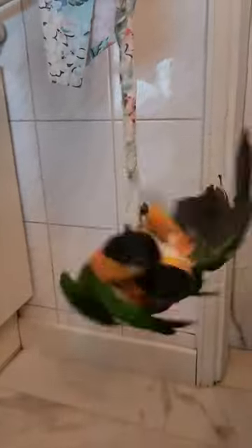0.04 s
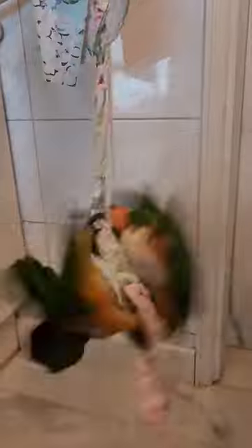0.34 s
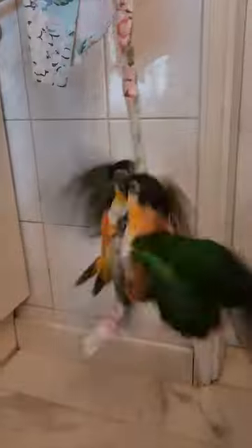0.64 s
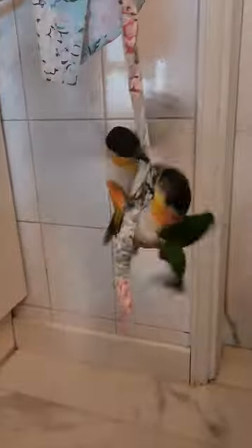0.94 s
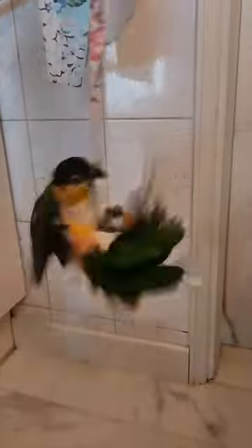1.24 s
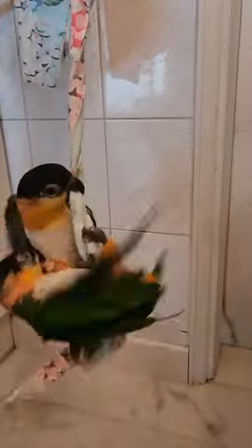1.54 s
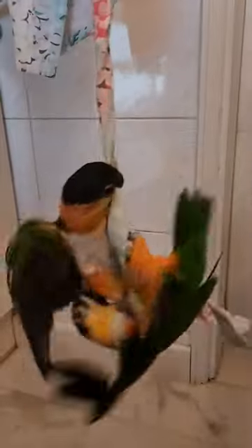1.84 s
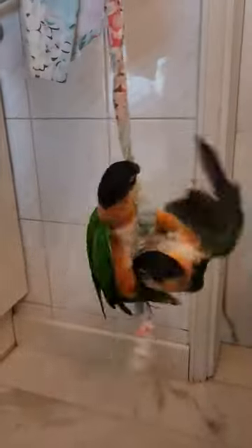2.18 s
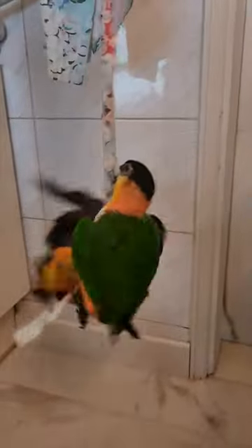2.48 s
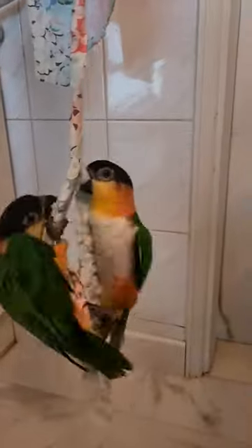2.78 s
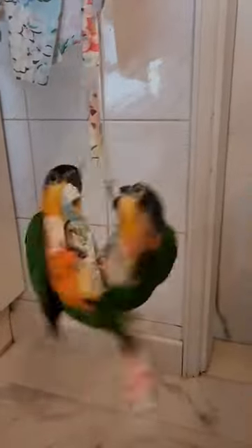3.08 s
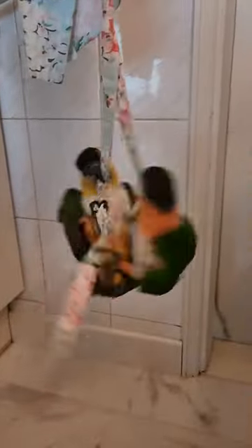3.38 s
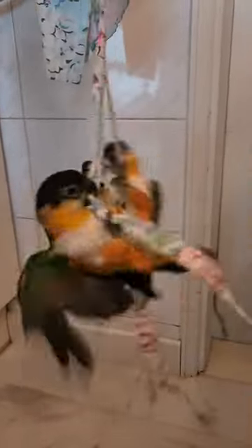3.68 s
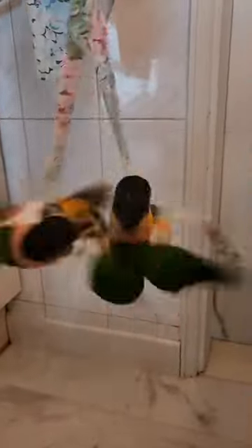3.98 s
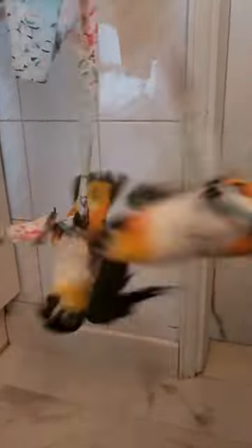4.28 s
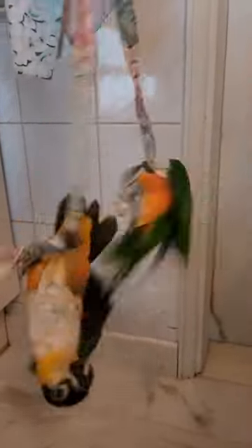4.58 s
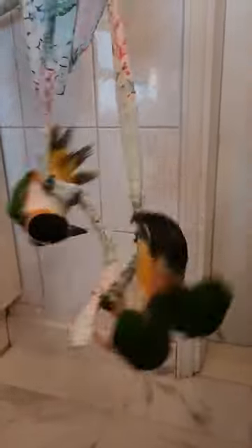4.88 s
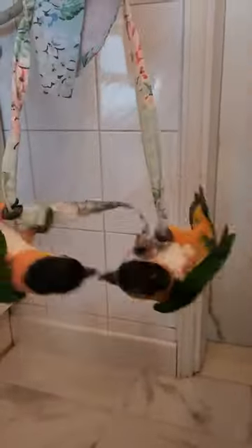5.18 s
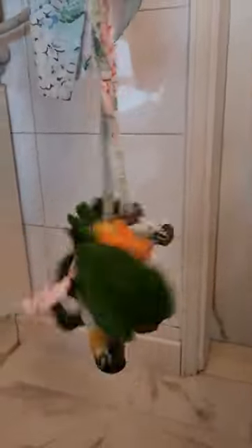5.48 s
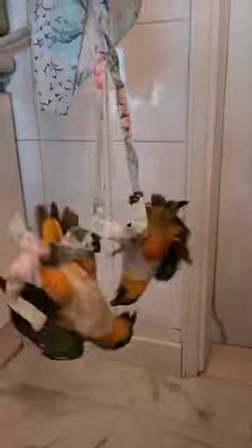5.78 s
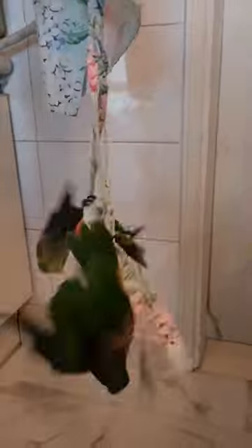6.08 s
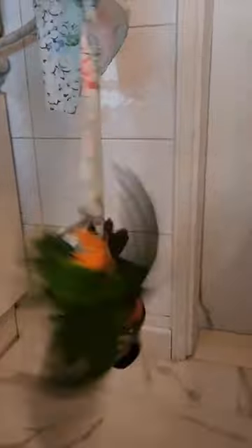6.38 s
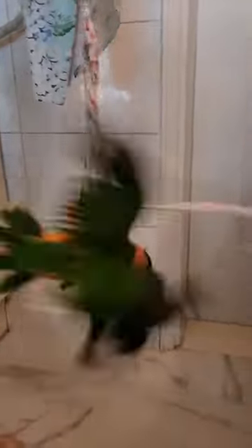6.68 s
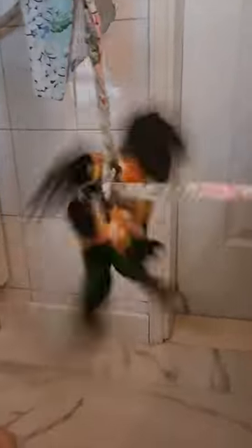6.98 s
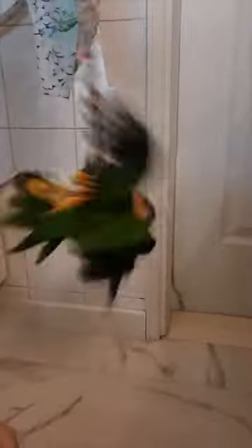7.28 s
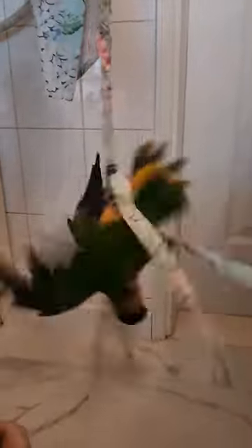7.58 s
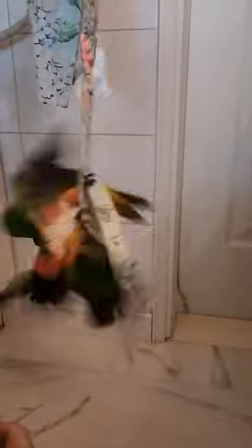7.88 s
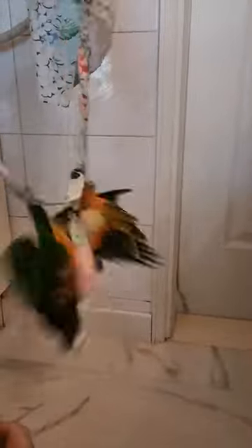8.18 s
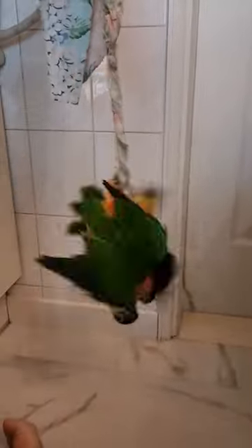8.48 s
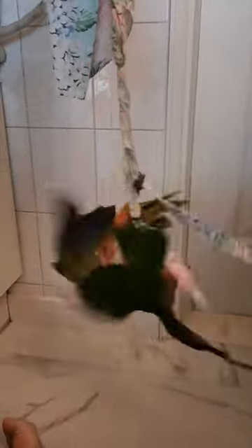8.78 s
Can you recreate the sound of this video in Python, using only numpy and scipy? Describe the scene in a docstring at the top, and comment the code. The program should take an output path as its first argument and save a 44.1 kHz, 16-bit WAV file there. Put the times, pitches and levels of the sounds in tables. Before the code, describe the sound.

Two small parrots flap and tussle close by in three bursts, with feather rustles, wing slaps and two brief hoarse calls.

```python
"""Parrots tussling in a kitchen

Two small parrots tussle on hanging cloth strings, close to the microphone in a tiled kitchen.
Each wingbeat is a swish of feathers, a soft whump and a puff of air on the microphone. Wing tips slap,
beaks and claws knock and scratch, and plumage and cloth rustle between the bursts. Near the end the
birds give two short hoarse calls. A fridge hums behind them."""
import sys
import numpy as np
from scipy import signal
from scipy.fft import rfft, irfft, next_fast_len
from scipy.io import wavfile
from scipy.ndimage import uniform_filter1d

SR = 44100
rng = np.random.default_rng(int(sys.argv[2]) if len(sys.argv) > 2 else 0)


def generate_wav(signal):
    """Clip the signal to [-1, 1] and save it as 16-bit WAV at the path in sys.argv[1]."""
    frames = np.transpose(np.atleast_2d(signal))
    scaled = np.clip(frames, -1, 1) * 32767
    pcm = np.round(scaled).astype(np.int16)
    wavfile.write(sys.argv[1], SR, pcm)


N = 394254
TIME = np.arange(N) / SR


def undb(db):
    """Decibels to gain."""
    return 10 ** (np.asarray(db) / 20)


def unit(x):
    """Scale to rms 1."""
    return x / np.sqrt(np.mean(x ** 2))


def over_hz(points, hz):
    """Read (frequency, value) points on a log-frequency axis."""
    f, value = np.transpose(points)
    return np.interp(np.log(np.maximum(hz, 1)), np.log(f), value)


def bouts(curves):
    """Gain over time from one (time, level) curve a bout, next to nothing between bouts."""
    curves_db = (np.interp(TIME, *np.transpose(rows), left=-np.inf, right=-np.inf) for rows in curves)
    return sum(undb(db) for db in curves_db) + 1e-5


def walk(rate, size=N):
    """A random wander of spread near 1, turning `rate` times a second."""
    steps = np.arange(size) * rate / SR
    points = rng.standard_normal(int(steps[-1]) + 2)
    return np.interp(steps, np.arange(len(points)), points) * np.sqrt(3 / 2)


# Stereo width by frequency: bass centred, middle wide and diffuse, treble narrow.
# (frequency [Hz], left-right correlation [-1 to 1])
STEREO_LIKENESS = [(130, 0.96), (280, 0.74), (550, 0.4), (1000, 0.1), (1600, -0.086), (2400, -0.017),
                   (3500, -0.17), (5900, -0.029), (6600, 0.94), (10000, 0.99), (15000, 0.71)]
# Stereo balance: (frequency [Hz], left minus right [dB])
STEREO_BALANCE = [(200, -2), (900, 0.5), (2000, -2.5), (3300, 2), (5500, -1.5), (6800, -4.5), (8000, -6.5),
                  (8600, 2), (10000, -2.5), (14000, 0)]
def hiss(envelope, colour, patchy_db=0):
    """Stereo noise under an envelope, filtered to a colour with random dips."""
    size = next_fast_len(len(envelope))
    hz = np.fft.rfftfreq(size, 1 / SR)
    mid, side = rfft(rng.standard_normal((2, len(envelope))) * envelope, size)
    likeness = np.clip(over_hz(STEREO_LIKENESS, hz), -1, 1)
    sign = np.array([[1], [-1]])
    pair = (mid * np.sqrt(1 + likeness) + sign * side * np.sqrt(1 - likeness)) / np.sqrt(2)
    pair = pair * undb(sign * over_hz(STEREO_BALANCE, hz) / 2)
    # each burst gets its own random dips across frequency
    humps = np.minimum(rng.standard_normal(size=72), .9)
    dips_db = patchy_db * np.interp(np.sqrt(hz), np.linspace(0, np.sqrt(SR / 2), len(humps)), humps)
    response = unit(undb(over_hz(colour, hz) + dips_db))
    return irfft(pair * response, size)[:, :len(envelope)]


def bursts(times, levels_db, colour, rise_s, fall_s, grain_db, grain_hz, patchy_db, size=8192):
    """A grainy swell of noise at each time; its loudest 15 ms reach the given level."""
    out = np.zeros((2, N + 2 * size))
    t = (np.arange(size) - size // 2) / SR
    swell = np.exp(-np.abs(t) / np.where(t < 0, rise_s, fall_s))
    for time, db in zip(times, levels_db):
        burst = hiss(swell * undb(grain_db * walk(grain_hz, size)), colour, patchy_db)
        loudest = uniform_filter1d(np.mean(burst ** 2, axis=0), size=660).max()
        start = int(time * SR)
        out[:, start:start + size] += burst * undb(db) / np.sqrt(loudest)
    return out[:, size // 2:size // 2 + N]


def pulses(times, levels_db, shape, spread, size=4096):
    """A pressure pulse shape(t) at each time, randomly stretched; its loudest 15 ms reach the level."""
    out = np.zeros(N + 2 * size)
    t = (np.arange(size) - size // 2) / SR
    for time, db, chance in zip(times, levels_db, rng.uniform(-1.16, 1, len(times))):
        pulse = shape(t * np.exp(spread * chance))
        loudest = uniform_filter1d(pulse ** 2, size=660).max()
        start = int(time * SR)
        out[start:start + size] += pulse * undb(db) / np.sqrt(loudest)
    return out[size // 2:size // 2 + N]


# Motor lines of the fridge, behind the birds: (frequency [Hz], rms level [dB])
FRIDGE_LINES = [(236.9, -71.5), (360.7, -63), (602.9, -75.5), (721.4, -81)]
# Colour of the kitchen's room tone: (frequency [Hz], relative density [dB])
ROOM_TONE = [(12, -37), (28, 3.5), (80, -1), (160, -10), (240, -1), (300, -14), (380, -5), (480, -2.5),
             (620, -9.5), (900, -16.5), (1500, -18.5), (2300, -36), (3500, -48), (15000, -38)]
def kitchen(drift=0.00346, waver_db=1.5, room_db=-61):
    """The fridge's slightly wavering motor lines over the soft noise of the room."""
    motor_time = np.cumsum(1 + drift * walk(9)) / SR
    hum = sum(np.sqrt(2) * undb(db + waver_db * walk(18)) * np.sin(2 * np.pi * hz * motor_time)
              for hz, db in FRIDGE_LINES)
    return hum + hiss(undb(room_db + 0.14 * walk(3.3)), ROOM_TONE)


# How hard the birds struggle, heard as rubbing feathers, one curve a bout: (time [s], level [dB])
EFFORT = [
    [(0.19, -56.5), (0.278, -48.5), (0.44, -44.5), (0.628, -41.5), (1.024, -43.5), (1.434, -50.5),
     (1.582, -53), (1.72, -58)],
    [(4.0, -55), (4.102, -46), (4.262, -45.5), (4.37, -41), (4.816, -50), (5.056, -58.5), (5.12, -69)],
    [(6.18, -50.5), (6.44, -47), (6.83, -48), (7.24, -42), (7.41, -49), (7.9, -47.5), (8.11, -48.5),
     (8.29, -51), (8.38, -59.5)],
    [(8.38, -56.5), (8.6, -56.5), (8.94, -55)],
]
# Plumage rubbing on the strings as a bird shifts its grip: (start [s], length [s], level [dB])
GRIP_SHIFTS = [(0.0, 0.013, -54.5), (1.777, 0.16, -50.5), (1.976, 0.2, -61), (2.18, 0.035, -54),
               (2.258, 0.11, -65), (2.738, 0.028, -53), (2.85, 0.24, -59.5), (3.17, 0.23, -59),
               (3.631, 0.17, -51), (3.854, 0.11, -53), (5.31, 0.23, -61), (5.537, 0.19, -54),
               (5.736, 0.14, -53), (5.92, 0.12, -56.5), (6.055, 0.095, -48.5), (7.133, 0.083, -54),
               (7.924, 0.14, -47.5), (8.548, 0.061, -47.5), (8.813, 0.15, -58.5)]
def rubbing(effort_trim_db=-1.5, fidget_db=-64.5, attack_s=0.029, release_s=0.032, sag_db_per_s=11):
    """Strength of the rubbing: bouts of effort, constant fidgeting, and grip shifts that swell and sag."""
    power = (undb(effort_trim_db) * bouts(EFFORT)) ** 2 + undb(fidget_db) ** 2
    for start, length, db in GRIP_SHIFTS:
        t = TIME - start
        edges = np.exp(np.minimum(t, 0) / attack_s - np.maximum(t - length, 0) / release_s)
        power += (edges * undb(db - sag_db_per_s * np.clip(t, 0, length))) ** 2
    return np.sqrt(power)


# Colour of feathers and cloth rubbing close by: (frequency [Hz], relative density [dB])
RUB_COLOUR = [(120, -8.5), (250, 0.5), (600, -5), (900, -8.5), (1300, -2.5), (1800, -3.5), (2200, -2),
              (3300, -7), (5400, -3), (6700, -1), (8000, -0.5), (8700, -4), (11200, -8), (15000, -11.5)]
def rustle(rub, flicks_per_s=42, scatter_db=1.5, flick_db=-2.5, bed_db=-7):
    """Feathers and cloth catch and let go in short flicks, each its own colour, over a smooth rubbing."""
    slots = np.arange(0, N / SR - 1 / flicks_per_s, 1 / flicks_per_s)
    delay, strength = rng.random((len(slots), 2)).T
    times = slots + delay / flicks_per_s
    rub_db = 20 * np.log10(np.interp(times, TIME, rub))
    levels_db = rub_db + flick_db + scatter_db * (2 * strength - 1)
    flicks = bursts(times, levels_db, RUB_COLOUR,
                    rise_s=0.0084, fall_s=0.028, grain_db=0, grain_hz=1100, patchy_db=8.5, size=4096)
    return flicks + undb(bed_db) * hiss(rub, RUB_COLOUR)


# Colour of a quill's tick or crack: (frequency [Hz], relative density [dB])
CRACK_COLOUR = [(500, -23), (2000, -1), (4000, 5.5), (5800, 0.5), (6800, 8), (8100, -0.5), (9000, 0),
                (15000, -1)]
def crackle(rub, ticks_per_s=80, scatter_db=3, trim_db=-10, decay_s=0.0012):
    """Single quills and claws snap past each other: tiny dry ticks within the rustle."""
    chance, strength = rng.random(N), rng.exponential(size=N)
    ticks = (chance < ticks_per_s / SR) * undb(scatter_db * np.minimum(strength, 4))
    envelope = signal.fftconvolve(ticks, np.exp(-TIME[:SR // 100] / decay_s))[:N]
    return undb(trim_db) * hiss(unit(envelope) * rub, CRACK_COLOUR)


# Wingbeats close to the microphone, about 14 a second, overlapping when both birds flap.
# Levels are before the trims: (time [s], feather swish [dB], air whoosh [dB], puff [dB])
WINGBEATS = [(0.282, -42.5, -54, -39), (0.36, -47, -46, -33), (0.453, -42, -46, -35.5),
             (0.522, -41.5, -44.5, -31.5), (0.59, -46, -43, -34), (0.62, -43, -41, -40),
             (0.687, -42, -40.5, -37.5), (0.775, -46, -42.5, -45), (0.83, -35.5, -39.5, -41),
             (0.875, -44, -41, -39), (0.948, -42.5, -45.5, -32.5), (0.978, -48, -48, -32.5),
             (1.015, -54, -60, -36), (1.049, -41, -46.5, -48), (1.102, -37.5, -37.5, -40),
             (1.158, -41, -41.5, -32), (1.195, -44, -45, -50), (1.25, -47.5, -47.5, -38.5),
             (1.32, -45.5, -62, -41.5), (1.36, -51, -64, -49), (1.452, -47.5, -59, -54),
             (1.509, -48.5, -55, -60), (1.574, -50, -74, -53), (1.779, -48, -53, -70),
             (4.068, -49, -53, -57), (4.136, -41, -53, -36.5), (4.2, -44.5, -49, -32),
             (4.225, -41.5, -47, -32.5), (4.277, -40.5, -42.5, -27), (4.355, -35, -37, -42),
             (4.43, -43, -42, -34), (4.49, -50, -64, -45), (4.586, -43, -56, -41), (4.716, -48, -70, -48),
             (4.798, -49.5, -70, -60.0), (4.894, -48.5, -58, -61.5), (4.936, -46, -60, -64),
             (5.565, -48, -57, -72), (5.757, -47.5, -69, -59.5), (6.258, -44, -55, -53.0),
             (6.3, -42.5, -45, -38.5), (6.353, -41, -40, -36), (6.431, -40, -41, -31.5),
             (6.499, -45, -42.5, -32.5), (6.569, -44.5, -43.5, -39), (6.646, -43.5, -45, -55),
             (6.709, -39.5, -51, -36.5), (6.78, -42.5, -43, -38), (6.855, -45, -44, -30.5),
             (6.922, -45.5, -45.5, -37), (7.016, -46.5, -45, -41), (7.088, -48, -46, -36),
             (7.135, -45, -43, -37), (7.16, -42.5, -45.5, -32.5), (7.23, -39.5, -35.5, -37),
             (7.274, -40, -47, -41), (7.32, -59, -52, -53), (7.386, -43, -47, -44),
             (7.446, -45.5, -51, -35.5), (7.531, -49, -56, -34.5), (7.642, -42, -45.5, -47),
             (7.723, -43, -51, -40), (7.815, -44, -47, -43), (7.905, -47.5, -48, -49),
             (7.982, -61, -50.5, -48.5), (8.06, -45.5, -51, -42), (8.149, -48, -68, -46),
             (8.209, -47, -57.5, -50), (8.295, -49.5, -55, -56), (8.458, -49.5, -54, -71),
             (8.546, -50.5, -57, -56), (8.603, -55, -58, -56), (8.65, -49.5, -57, -51),
             (8.75, -50, -57.5, -59)]
# Colours of a stroke's swish, whoosh and whump: (frequency [Hz], relative density [dB])
SWISH_COLOUR = [(1500, -18.5), (3200, -10), (5600, -6.5), (6700, -6.5), (8100, -4.5), (8700, -12.5),
                (10000, -8), (11200, -13), (15000, -11.5)]
WHOOSH_COLOUR = [(300, -7), (560, 7), (720, 5), (950, -1), (1160, 0), (1600, 2.5), (2200, -0.5), (3200, -8),
                 (6000, -9.5), (15000, -25)]
WHUMP_COLOUR = [(70, -13), (110, -4), (150, 1.5), (235, -1.5), (310, -12.5), (450, -12), (650, -21.5),
                (1100, -19), (2500, -66)]
def wings(swish_trim_db=1.3, whoosh_trim_db=-2, whump_trim_db=-16.5):
    """Feathers flick over each other and air rushes past them; the wing's push is a short whump."""
    times, swish_db, whoosh_db, puff_db = np.transpose(WINGBEATS)
    swish = bursts(times - .003, swish_db + swish_trim_db, SWISH_COLOUR,
                   rise_s=0.015, fall_s=0.023, grain_db=1.5, grain_hz=1300, patchy_db=7)
    whoosh = bursts(times - .004, whoosh_db + whoosh_trim_db, WHOOSH_COLOUR,
                    rise_s=0.016, fall_s=0.021, grain_db=4, grain_hz=400, patchy_db=11)
    whump = bursts(times - .005, puff_db + whump_trim_db, WHUMP_COLOUR,
                   rise_s=0.0081, fall_s=0.023, grain_db=1, grain_hz=180, patchy_db=4.5)
    return swish + whoosh + whump


# Stirred air reaching the microphone, one curve a bout: (time [s], level before the trim [dB])
DRAUGHT = [
    [(0.19, -62), (0.214, -68), (0.274, -46.5), (0.534, -33), (0.636, -35.5), (1.246, -37.5), (1.276, -46),
     (1.664, -64), (1.72, -78)],
    [(3.7, -87), (3.814, -60), (4.044, -61), (4.108, -49), (4.122, -36.5), (4.282, -33.5), (4.308, -34.5),
     (4.362, -28.5), (5.0, -81)],
    [(6.18, -64), (6.32, -41.5), (6.49, -34.5), (6.65, -46), (6.7, -37.5), (7.5, -44), (8.52, -61),
     (8.63, -58), (8.8, -75)],
]
# Colour of eddies on the microphone: (frequency [Hz], relative density [dB])
EDDY_COLOUR = [(10, -23), (22, 3.5), (42, -1), (90, -0.5), (135, -9), (220, -16), (450, -40), (1500, -74)]
def downwash(puff_trim_db=-1, lead_s=0.0053, eddy_trim_db=-3, eddy_life_s=.035, steadiness=0.45):
    """Each stroke pushes and pulls the air at the microphone; eddies flutter on between strokes."""
    def puff(t, hz=62, rise_s=0.0078, wake_s=0.013):
        return np.sin(2 * np.pi * hz * t) * np.exp(-(t / np.where(t < 0, rise_s, wake_s)) ** 2)

    times, _, _, puff_db = np.transpose(WINGBEATS)
    puffs = pulses(times - lead_s, puff_db + puff_trim_db, puff, spread=0.49, size=8192)
    eddies = hiss(np.ones(N), EDDY_COLOUR)
    window = signal.windows.hann(int(2 * eddy_life_s * SR))
    power = signal.fftconvolve(np.mean(eddies ** 2, axis=0), window, "same")
    flutter = unit(eddies / np.sqrt(power) ** steadiness)  # steadiness 0 is gusty, 1 is even
    return puffs + undb(eddy_trim_db) * bouts(DRAUGHT) * flutter


# Wings striking cloth or the other bird, at close range:
# (time [s], crack level [dB], thwack level [dB], thwack centre [Hz], rise [s])
WING_SLAPS = [(0.387, -39.5, -40, 1010, .0005), (0.685, -44, -44, 1500, .001),
              (0.823, -39, -39, 1500, 0.00085), (0.976, -46, -43, 1100, .001),
              (1.102, -39.5, -33, 680, 0.0058), (1.177, -45, -41, 1400, .006), (1.25, -50, -47, 700, .003),
              (3.613, -44.5, -53, 366, 0.00037), (4.161, -58, -44, 1010, .001), (4.29, -48, -50, 500, .002),
              (4.353, -40, -37, 900, 0.0066), (4.411, -54, -38.5, 800, .001),
              (4.501, -46.5, -53, 2100, .001), (4.586, -53, -60, 1300, .002),
              (5.552, -62, -55, 1400, 0.0012), (5.865, -66, -57, 300, .001), (6.298, -58, -63, 1300, .002),
              (6.347, -49, -45, 700, .002), (6.416, -52, -41.5, 520, 0.0011),
              (6.494, -40, -40.5, 600, .0003), (6.567, -43.5, -47, 650, .003),
              (6.693, -56, -47, 550, 0.0035), (6.904, -53, -40, 450, 0.0011),
              (7.208, -37, -41.5, 445, 0.00026), (7.335, -56, -46, 450, .001), (7.437, -61, -41, 557, .003),
              (7.511, -56, -42.5, 460, 0.0005), (7.79, -40.5, -50, 614, 0.0004),
              (7.978, -45, -52, 1500, .001)]
# Colour of a thwack: (frequency [multiple of its centre], relative density [dB])
THWACK_COLOUR = [(.15, 0), (.6, -5.5), (1, -1), (1.6, -8.5), (3, -15.5), (6, -25), (14, -42)]
def slaps():
    """A stiff feather lands with a crack and a thwack; a broad contact is lower, a glancing one swells."""
    out = np.zeros((2, N))
    for time, crack_db, thwack_db, centre_hz, rise_s in WING_SLAPS:
        colour = np.array(THWACK_COLOUR) * [centre_hz, 1]
        out += bursts([time], [crack_db], CRACK_COLOUR,
                      rise_s, fall_s=0.012, grain_db=3, grain_hz=1500, patchy_db=1)
        out += bursts([time], [thwack_db], colour,
                      rise_s, fall_s=0.0078 + rise_s, grain_db=0.5, grain_hz=590, patchy_db=5.5)
    return out


# Beaks, claws and wing bones knocking: (time [s], level [dB], main ring [Hz], brightness [dB/octave])
KNOCKS = [(0.387, -42, 1180, 2), (0.686, -49, 1360, 7), (0.823, -48.5, 1400, -8), (1.101, -39, 720, 0),
          (3.613, -55, 1300, 1), (7.659, -47.5, 1124, -11), (8.579, -48.5, 1200, 8.5)]
# What a knock rings with: (frequency [multiple of the main ring], relative level [dB], decay [s])
KNOCK_MODES = [(.72, -12, 0.0037), (1, 0, 0.0049), (1.37, -6.5, 0.0046), (2.05, 0, 0.0026),
               (3.1, -12, 0.0023)]
def knocks():
    """Hard parts meet at once and ring for a few milliseconds; a padded contact rings duller."""
    out = np.zeros(N)
    for time, db, hz, tilt in KNOCKS:
        def ring(t):
            return (t > 0) * sum(undb(mode_db + tilt * np.log2(ratio))
                                 * np.sin(2 * np.pi * ratio * hz * t) * np.exp(-np.abs(t) / decay_s)
                                 for ratio, mode_db, decay_s in KNOCK_MODES)
        out += pulses([time], [db], ring, spread=0.035)
    return out


# Hard downstrokes near the microphone: (time [s], level before the trims [dB], nominal pitch [Hz])
DOWNSTROKES = [(0.389, -39, 208), (0.577, -38, 160), (0.656, -36.5, 170), (0.689, -46, 200),
               (0.728, -41.5, 170), (0.826, -42, 211), (0.879, -36.5, 170), (0.978, -42.5, 220),
               (1.099, -41, 179), (1.157, -41, 172), (1.816, -57, 223), (2.518, -59, 318),
               (4.198, -43, 169), (4.368, -33, 223), (4.411, -34.5, 183), (4.588, -44.5, 200),
               (6.126, -51.5, 246), (6.35, -39, 248), (6.421, -38.5, 220), (6.496, -37, 164),
               (6.56, -39, 210), (6.632, -44, 213), (6.695, -30.5, 232), (6.773, -37.5, 155),
               (6.843, -37, 165), (6.908, -34.5, 192), (7.154, -36, 200), (7.237, -36, 261),
               (7.335, -38, 228), (7.369, -37, 193), (7.437, -34.5, 215), (7.514, -34.5, 165),
               (7.707, -45.5, 220), (7.801, -48, 213), (7.9, -49.0, 220), (7.975, -47, 196),
               (8.057, -47.5, 221), (8.55, -51.5, 263), (8.583, -48, 276)]
def claps(decay_s=0.009, thump_trim_db=-0.5, rough_trim_db=-7, air_trim_db=-12.5):
    """A hard downstroke squeezes the air under the wing: a thump of a cycle or two amid rough air."""
    thumps = np.zeros(N)
    for time, db, hz in DOWNSTROKES:
        def thump(t):
            return (t > 0) * np.sin(2 * np.pi * hz * t) * np.exp(-np.abs(t) / decay_s)
        thumps += pulses([time - .003], [db + thump_trim_db], thump, spread=0.13)
    times, levels_db, _ = np.transpose(DOWNSTROKES)
    rough = bursts(times, levels_db + rough_trim_db, WHUMP_COLOUR,
                   rise_s=0.0061, fall_s=0.023, grain_db=1.5, grain_hz=250, patchy_db=-0.5)
    air = bursts(times, levels_db + air_trim_db, WHOOSH_COLOUR,
                 rise_s=0.0058, fall_s=0.019, grain_db=2, grain_hz=660, patchy_db=-2)
    return thumps + rough + air


# Claws and beaks scratching over cloth and quills, close by: (time [s], level [dB], rise [s])
SCRATCHES = [(1.458, -54, 0.0065), (2.761, -67, .004), (2.831, -51.5, 0.0033), (5.746, -54, .007),
             (8.268, -45, 0.0022), (8.579, -49, 0.0011)]
# Colour of a scratch: (frequency [Hz], relative density [dB])
SCRATCH_COLOUR = [(1500, -24), (4000, -6), (5600, -6), (6800, -2.5), (8000, 3), (8800, -6), (10000, -6),
                  (12000, -9), (15000, -13)]
def scratches():
    """A claw or beak drags over the weave: a brief, thin, gritty rasp."""
    return sum(bursts([time], [db], SCRATCH_COLOUR,
                      rise_s, fall_s=0.01, grain_db=2.5, grain_hz=1400, patchy_db=2.5)
               for time, db, rise_s in SCRATCHES)


# A low grumble in the tussle, then a brighter rasp: (time [s], level [dB], pitch before the lift [Hz])
GRUMBLE = [(7.635, -58, 478), (7.652, -54, 525), (7.664, -49, 543), (7.678, -53, 523), (7.70, -58, 507)]
RASP = [(8.826, -67, 490), (8.84, -54, 540), (8.858, -50, 600), (8.88, -55, 580), (8.90, -57, 620),
        (8.92, -59, 595), (8.94, -56, 565)]
# Throat resonances before the lift: (frequency [Hz], width [Hz], relative level [dB])
THROAT = [(1160, 85, -9.5), (1530, 190, -3), (1850, 300, -5), (2030, 92, -5), (3080, 250, -11),
          (3770, 870, -7.5)]
def call(rows, bright_hz, jitter=0.062, lift_per_s=1.27):
    """A hoarse note: wobbling pulses and air through the parrot's throat, which tightens and lifts it."""
    times, levels_db, pitch_hz = np.transpose(rows)
    start, stop = int(times[0] * SR), min(int(times[-1] * SR), N)
    t = TIME[start:stop]
    hz = np.fft.rfftfreq(len(t), 1 / SR)
    pitch = np.interp(t, times, pitch_hz) * (1 + jitter * walk(698, len(t)))
    phase = 2 * np.pi * np.cumsum(pitch) / SR
    buzz = unit(sum(np.cos(k * phase) for k in range(1, 9)))
    breath = rng.standard_normal((2, len(t)))
    throat = sum(undb(db) / (1 + (2 * (hz - centre) / width) ** 2) for centre, width, db in THROAT)
    throat = throat / (1 + (hz / bright_hz) ** 4)  # a closed beak dulls the note
    voiced, airy = (unit(irfft(rfft(x) * throat, len(t))) for x in (buzz, breath))
    # reading ever faster lifts pitch and resonances together
    lifted = np.cumsum(1 + lift_per_s * (t - times[np.argmax(levels_db)]))
    voice = np.array([np.interp(lifted, np.arange(len(t)), x, period=len(t)) for x in voiced + airy])
    note = undb(np.interp(t, times, levels_db)) * unit(voice)
    return np.pad(note, ((0, 0), (start, N - stop)))


def tiles(sound, t60_s=0.21, tail_db=-8, delay_s=0.003, low_hz=250):
    """Tiled walls give a short, bright, diffuse tail with little bass."""
    t = TIME[:SR // 2]
    tail = rng.standard_normal((2, len(t))) * undb(-60 * t / t60_s) * (t > delay_s)
    tail = tail / np.sqrt(np.sum(tail ** 2, axis=1, keepdims=True))
    tail = signal.sosfilt(signal.butter(2, low_hz, "high", fs=SR, output="sos"), tail)
    return undb(tail_db) * signal.fftconvolve(sound, tail, axes=1)[:, :N]


def scene():
    """The birds sound in the room, the fridge behind them; their downwash only buffets the microphone."""
    rub = rubbing()
    birds = wings() + claps() + slaps() + knocks() + scratches() + rustle(rub) + crackle(rub)
    birds += call(GRUMBLE, bright_hz=1280) + call(RASP, bright_hz=6000)
    return birds + tiles(birds) + downwash() + kitchen()


def record(dry):
    """The recorder cuts the treble steeply above 15350 Hz."""
    return signal.sosfilt(signal.ellip(12, .1, 80, 15350, fs=SR, output="sos"), dry)


dry = scene()
out = record(dry)
generate_wav(out)
```